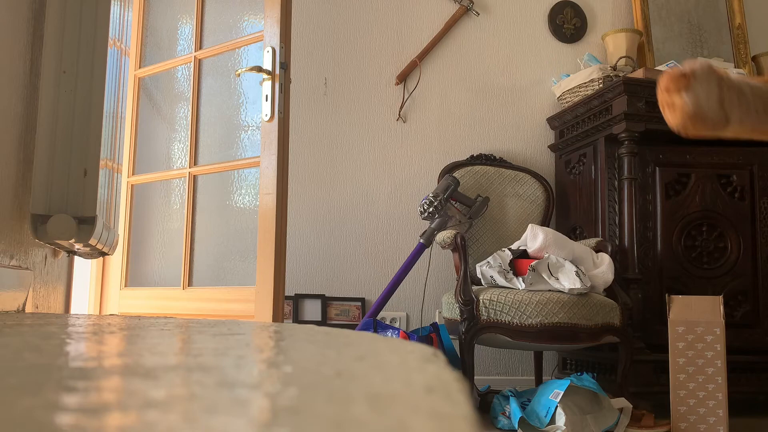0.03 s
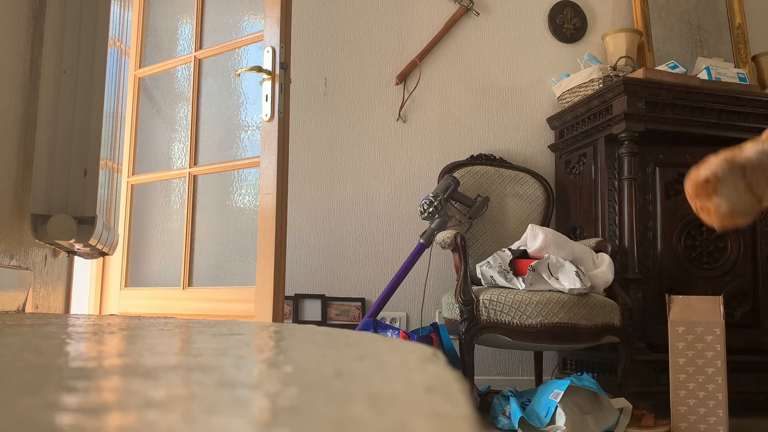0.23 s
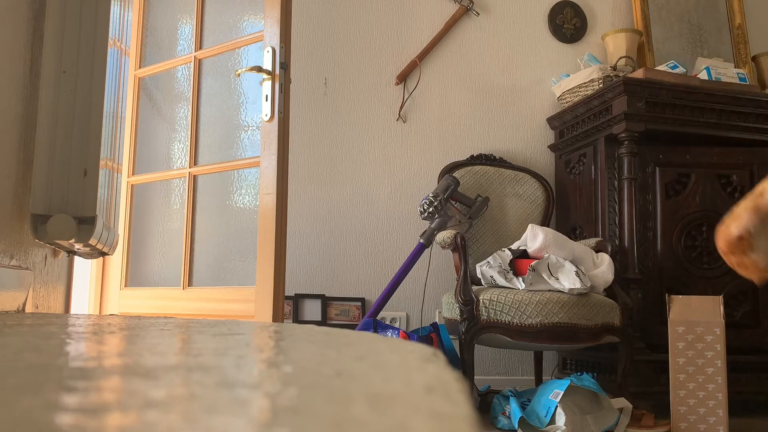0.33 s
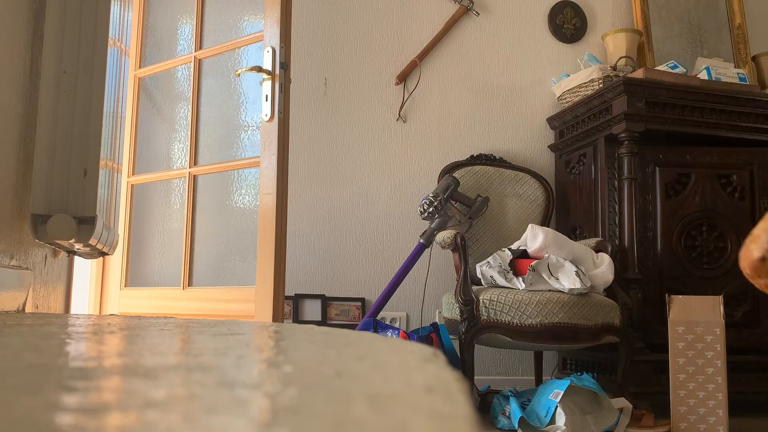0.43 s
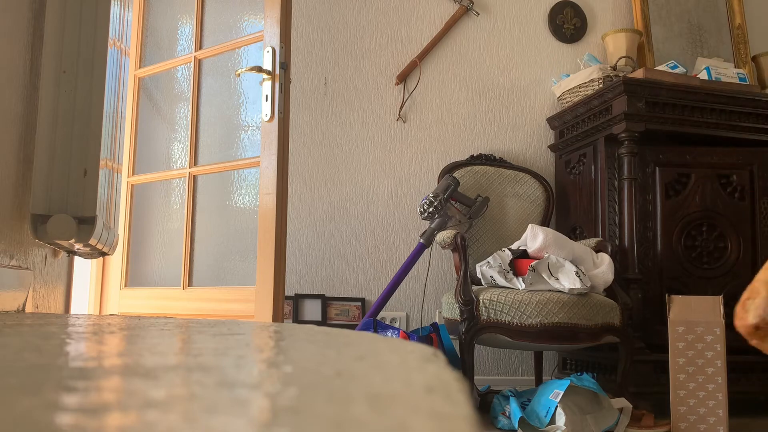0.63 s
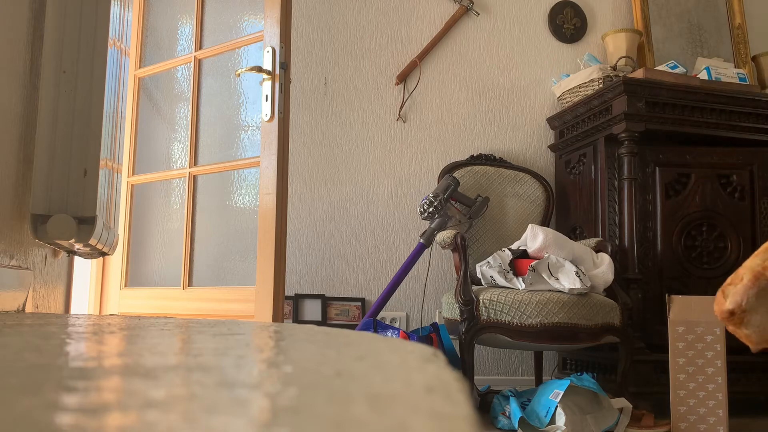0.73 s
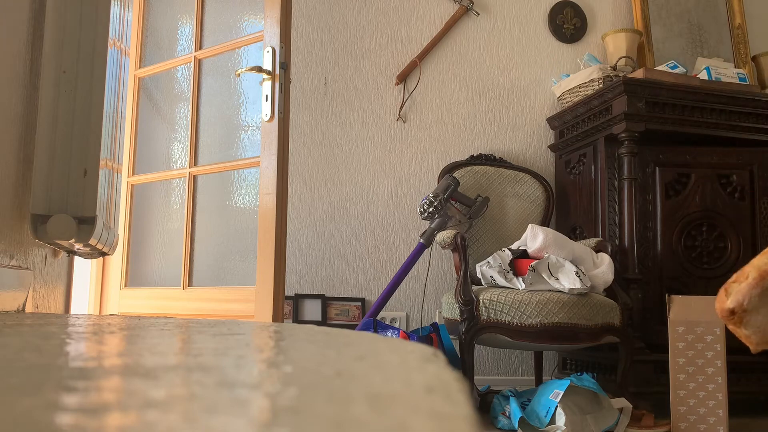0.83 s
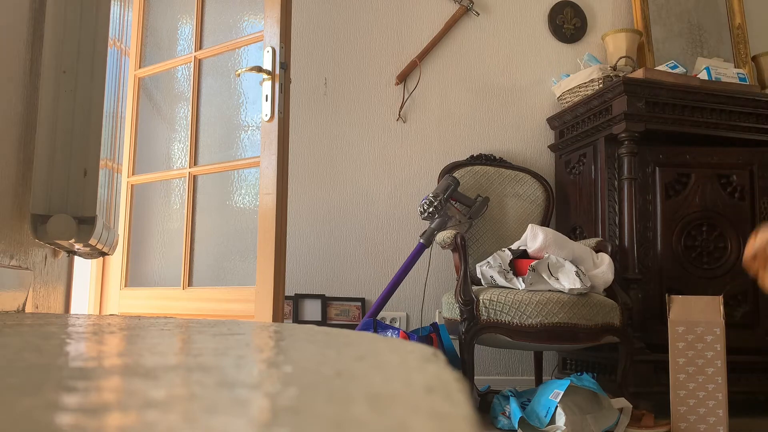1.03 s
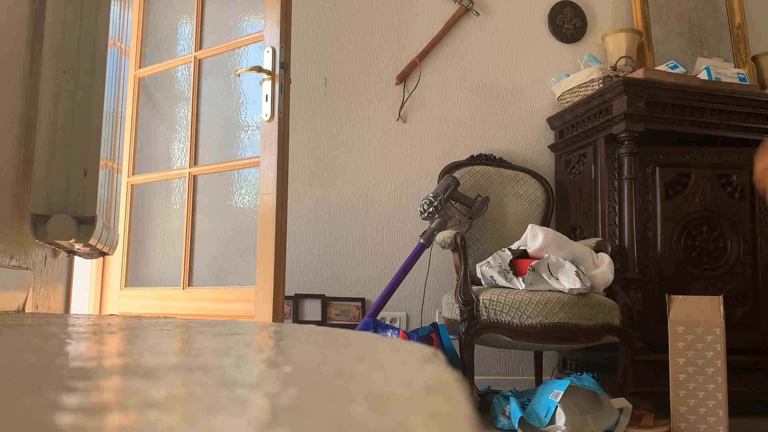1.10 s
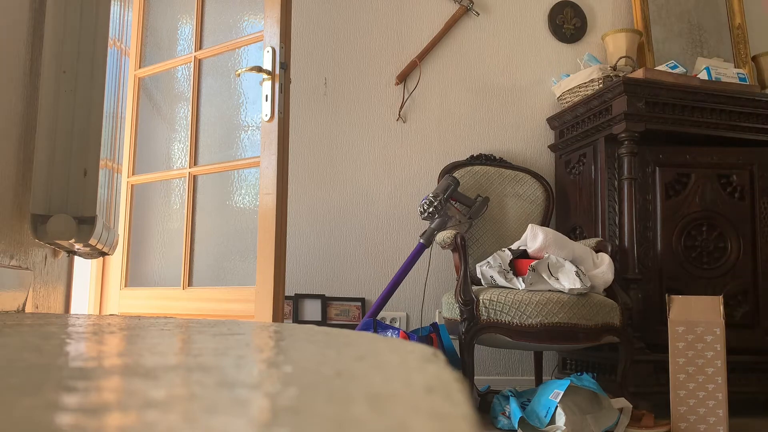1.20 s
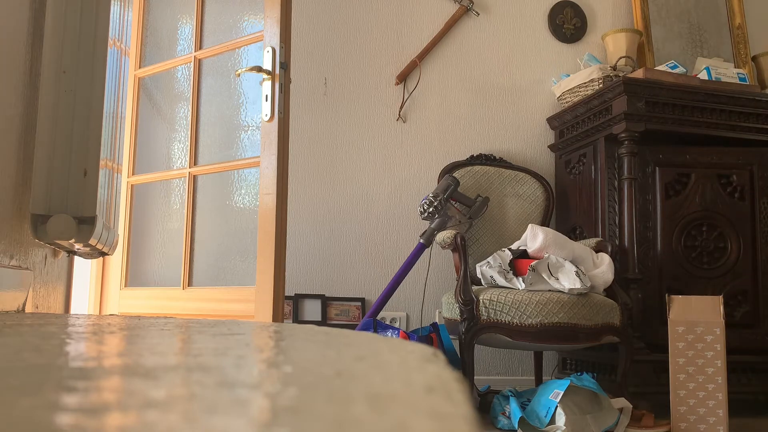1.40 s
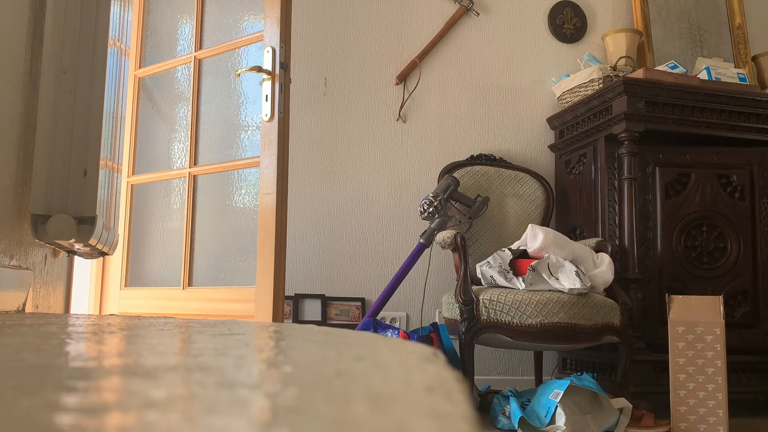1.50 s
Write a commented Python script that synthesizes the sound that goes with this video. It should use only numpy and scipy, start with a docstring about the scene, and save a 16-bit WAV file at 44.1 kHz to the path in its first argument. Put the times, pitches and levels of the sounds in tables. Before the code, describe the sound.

A hard loaf knocks once on a hard surface at about 0.2 seconds, slightly to the right, just after a faint sleeve swish. The crust cracks sharply over a hollow thud, rebounding lightly at 0.3 seconds, and the quiet room booms briefly. Faint crust ticks follow near 0.7 seconds, soft bumps around 0.9 and 1.0, then a light rub and a short, faint scrape with cloth rustle near 1.3.

```python
"""A sharp crack over a dull hollow thud: a hard loaf knocked once on a hard surface, a little to the right.
The crust cracks while loaf and surface ring together; the loaf rebounds lightly, the walls throw the
knock back and the quiet, live room booms briefly. A sleeve swishes as the arm moves; faint crust ticks,
soft bumps, a light rub and a short scrape come with the handling."""
import sys
import numpy as np
from scipy import signal
from scipy.fft import rfft, irfft
from scipy.io import wavfile
from scipy.ndimage import uniform_filter1d

SR = 44100
rng = np.random.default_rng(int(sys.argv[2]) if len(sys.argv) > 2 else 0)


def digitize_waveform(pressure):
    """Quantize a signal to 16-bit integers and store it at the path in sys.argv[1].

    Rows of a 2-D input are taken as channels; values are limited to [-1, 1].
    """
    field = np.atleast_2d(pressure).T
    bounded = np.clip(field, -1, 1)
    quanta = np.round(bounded * 32767).astype(np.int16)
    wavfile.write(sys.argv[1], SR, quanta)


N = 68355
T = np.arange(N) / SR
HZ = np.fft.rfftfreq(N, 1 / SR)
KNOCK_S, REBOUND_S = .2258, .3095
CRACK_RISE_S, RIGHT_LEAD_S = .0026, .00042


# joint modes of loaf and surface (frequency [Hz], level [dB], t60 [s])
LOAF_MODES = [(187.2, 1, 0.11), (297.3, -7, 0.12), (380, -11, .085), (548.4, -13.5, 0.057),
              (730.5, -20.5, 0.14), (951, -16.5, 0.15), (1118, -18.5, .15), (1441, -21, .11),
              (1680, -18.5, 0.1), (2028, -18, 0.043), (3200, -18.5, 0.0092)]
# crust crack spectrum (frequency [Hz], density [dB])
CRACK_SPECTRUM = [(150, 4.5), (500, 4.5), (1100, 2.5), (1700, -7.5), (2400, -16), (3200, -16.5),
                  (4500, -22.5), (7000, -34.5), (10000, -53), (15000, -41.5)]

def contact(start_s, thud_db, crack_db):
    """One contact of the loaf: a hollow thud under the crack of the crust."""
    thud = amp(thud_db) * ring(LOAF_MODES, start_s)
    crack = amp(crack_db) * noise(CRACK_SPECTRUM) * burst(start_s - RIGHT_LEAD_S, CRACK_RISE_S, t60_s=.072)
    return np.array([thud, delay(thud, -RIGHT_LEAD_S)]) + crack


# graze spectrum (frequency [Hz], density [dB])
GRAZE_SPECTRUM = [(100, 0), (200, 0), (400, -8.5), (580, 4.5), (900, -19.5), (2000, -20), (5000, -45)]
# crumbling spectrum (frequency [Hz], density [dB])
CRUNCH_SPECTRUM = [(1000, -3.5), (2000, -5.5), (3200, 0), (4000, 5.5), (7000, -1.5), (10000, -24),
                   (15000, -11)]

def crust():
    """The crust grazes the surface, then crumbles a little under the blow."""
    graze = amp(-17) * noise(GRAZE_SPECTRUM) * np.exp(-abs(T - KNOCK_S) / .0053)
    crunch = amp(-41) * noise(CRUNCH_SPECTRUM) * grains(depth_db=1.5, size_samples=40)
    return graze + crunch * burst(KNOCK_S, CRACK_RISE_S, t60_s=.16)


# low push of the blow (frequency [Hz], level [dB], t60 [s])
PUSH_MODES = [(60, -7, .055), (104, -7, .067)]
# arrivals of the push (delay [s], gain [dB])
PUSH_ARRIVALS = [(0, 2), (0.0476, -1.4), (.091, 1.5), (0.148, -11), (0.2349, -13.5), (.305, -23.5)]

def flutter(start_s=.2308):
    """The blow's low push bounces to and fro between two walls."""
    return sum(amp(db) * ring(PUSH_MODES, start_s + delay_s) for delay_s, db in PUSH_ARRIVALS)


# wall reflections (delay [s], gain [dB], left lag [s])
WALL_ECHOES = [(0.0438, -17, -0.0024), (0.0762, -9, .00075), (.112, -13, .0006), (.182, -22, -.0004)]

def wall_echoes(cutoff_hz=695):
    """Single echoes of the thud, dulled by the walls."""
    dulled = signal.lfilter(*signal.butter(1, cutoff_hz, fs=SR), ring(LOAF_MODES, KNOCK_S))
    return sum(amp(db) * np.array([delay(dulled, delay_s + lag_s), delay(dulled, delay_s)])
               for delay_s, db, lag_s in WALL_ECHOES)


# diffuse room spectrum (frequency [Hz], density [dB])
REVERB_SPECTRUM = [(25, -38), (45, 0), (140, -5), (320, -2.5), (450, -7.5), (700, -8), (1100, -10.5),
                   (2000, -20), (2700, -27.5), (4000, -33), (7000, -46), (15000, -73.5)]
# far-end return spectrum (frequency [Hz], density [dB])
RETURN_SPECTRUM = [(60, -18.5), (130, -5), (330, 0), (450, -4.5), (670, 0.5), (850, -19.5), (1150, -9),
                   (2000, -31), (6000, -51), (15000, -73)]
# standing waves (frequency [Hz], level [dB], t60 [s], left lag [rad])
STANDING_WAVES = [(103, -24, .9, .3), (156, -16, .42, -.4), (174, -15, .42, 0), (212, -24, .6, .8),
                  (251, -11, .44, 1.1), (275, -18, .52, .9), (320, -18, .55, .8), (352, -24, .62, 0),
                  (377, -18.5, .55, 1.7), (413, -24, .53, 1), (515, -20.5, .5, 2), (562, -24.5, .42, 2.2),
                  (668, -32, .5, 2)]

def room():
    """The knock reverberates, scatters back from the far end and excites standing waves."""
    diffuse = amp(-17) * reverb(REVERB_SPECTRUM, KNOCK_S)
    far_return = amp(-21) * noise(RETURN_SPECTRUM) * swell(KNOCK_S + .0997, width_s=.019)
    boom = np.zeros((2, N))
    for hz, db, t60_s, lag_rad in STANDING_WAVES:
        phase = 2 * np.pi * hz * (T - KNOCK_S) + np.array([[0], [lag_rad]])
        boom += amp(db) * burst(KNOCK_S, .025, t60_s) * np.sin(phase)
    return diffuse + far_return + boom


# room decay (frequency [Hz], t60 [s])
REVERB_DECAY = [(60, .42), (130, 0.95), (250, 0.63), (600, 0.62), (1000, 0.52), (2000, 0.43), (5000, 0.25)]

def reverb(spectrum, start_s):
    """Diffuse reverberation, each band dying at its own rate."""
    hz, time_s, bands = signal.stft(noise(spectrum), SR, nperseg=512)
    age_s = np.maximum(time_s - start_s, 0)
    decay = np.exp(-np.log(1000) * age_s / lookup(REVERB_DECAY, hz)[:, None])
    tail = signal.istft(bands * decay, SR, nperseg=512)[1][:, :N]
    return tail * burst(start_s, rise_s=.01, t60_s=np.inf)


# bump modes (frequency [Hz], level [dB], t60 [s])
BUMP_MODES = [(83.4, 5, 0.092), (120.5, 6.5, 0.058), (192, -8.5, 0.12), (265, -28, 0.056),
              (406.5, -20.5, .1)]
# handling bumps (time [s], gain [dB])
BUMP_EVENTS = [(.915, -28), (1.017, -38.5)]

def bumps():
    """Soft handling bumps, each a short low ring."""
    return sum(amp(db) * ring(BUMP_MODES, start_s) for start_s, db in BUMP_EVENTS)


# scrape resonances (frequency [Hz], width [Hz], level [dB])
SCRAPE_PEAKS = [(830, 82, -1.5), (950, 120, 0.5), (1165, 75, -2), (1875, 160, -2), (2800, 150, -8.5)]

def scrape():
    """Dry friction catches quickly and dies away as the arm withdraws."""
    return amp(-39) * friction(SCRAPE_PEAKS) * burst(1.278, rise_s=.019, t60_s=.35)


# swish envelopes (time [s], treble [dB], body [dB], fizz [dB])
SWISH_LEVELS = [(.08, -64, -72, -64.5), (0.127, -48.5, -48, -51), (0.199, -53.5, -50, -57.5),
                (0.299, -65.5, -42.5, -64), (.4, -57.5, -51, -56), (0.499, -58, -55, -59.5),
                (0.619, -68.5, -70, -73), (.67, -64.5, -57.5, -67.5), (.76, -71, -65, -76),
                (.92, -66.5, -62.5, -68), (1.08, -65, -66.5, -59), (1.18, -60, -58, -58.5),
                (1.254, -59, -57.5, -57.5), (1.296, -45.5, -43.5, -48.5), (1.42, -54, -51, -56),
                (1.49, -62, -58, -67), (1.55, -85, -67, -84)]
# spectra of the three swish bands (frequency [Hz], density [dB])
TREBLE_SPECTRUM = [(1500, -15), (2500, -6), (2850, 4.5), (3300, -0.5), (5000, 0), (8800, 0), (10200, -48),
                   (15500, -29)]
BODY_SPECTRUM = [(100, -15), (400, 4.5), (830, 1), (1400, -1.5), (1950, -1.5), (2850, -6), (4500, -21.5),
                 (9000, -41)]
FIZZ_SPECTRUM = [(3000, -27), (10000, -18), (11200, -2.5), (13000, -1), (15500, -2)]

def sleeve():
    """Grainy cloth friction swells with each move of the arm."""
    time_s, *levels_db = np.transpose(SWISH_LEVELS)
    spectra = TREBLE_SPECTRUM, BODY_SPECTRUM, FIZZ_SPECTRUM
    swish = sum(amp(np.interp(T, time_s, db)) * noise(band) for db, band in zip(levels_db, spectra))
    return swish * grains(depth_db=1.5, size_samples=60)


# downswing envelope (time [s], level [dB])
SWING_LEVELS = [(0, -87), (.08, -53), (.14, -43), (.22, -41.5), (.3, -73)]
# downswing spectrum (frequency [Hz], density [dB])
SWING_SPECTRUM = [(50, -26), (215, -9), (262, 5.5), (305, -6), (370, -10), (460, -28.5), (2000, -46)]

def arm_swing():
    """Low rustle as the arm swings down."""
    return amp(np.interp(T, *np.transpose(SWING_LEVELS))) * noise(SWING_SPECTRUM)


# crust ticks (time [s], level [dB], fizz [dB])
TICK_EVENTS = [(0.2064, -40.5, -41.5), (0.655, -42, -63), (0.7072, -47.5, -77)]
# tick spectrum (frequency [Hz], density [dB])
TICK_SPECTRUM = [(200, 2.5), (1200, -2.5), (2200, 0), (3500, -9), (5200, -10), (8000, -35.5), (15000, -30)]
# crust resonances (frequency [Hz], width [Hz], level [dB])
CRUST_PEAKS = [(1580, 220, -10), (2190, 200, -2), (2440, 130, -0.5)]

def ticks():
    """Faint crust ticks: a snap, its reverberation, a brief ring and a bright fizz."""
    out = np.zeros((2, N))
    for start_s, db, fizz_db in TICK_EVENTS:
        snap = noise(TICK_SPECTRUM) * burst(start_s, rise_s=.0011, t60_s=.04)
        tail = amp(-17) * reverb(TICK_SPECTRUM, start_s)
        ringing = amp(-7) * friction(CRUST_PEAKS) * burst(start_s, rise_s=.0012, t60_s=.079)
        fizz = (noise(TREBLE_SPECTRUM) + noise(FIZZ_SPECTRUM)) * burst(start_s, rise_s=.00036, t60_s=.043)
        out += amp(db) * (snap + tail + ringing) + amp(fizz_db) * fizz
    return out


def rub():
    """A light rub excites the crust's resonances."""
    return amp(-56) * friction(CRUST_PEAKS) * swell(1.181, width_s=.059)


# room tone spectrum (frequency [Hz], density [dB])
AIR_SPECTRUM = [(20, -47.5), (50, -8.5), (100, -6), (450, -9.5), (700, -19), (1000, -16.5), (1400, -24.5),
                (2500, -27), (15000, -54.5)]

def room_tone(hum_hz=101.6):
    """Quiet air with a faint mains hum."""
    hum = amp(-59) * np.sqrt(2) * np.sin(2 * np.pi * hum_hz * T)
    return amp(-53.5) * noise(AIR_SPECTRUM) + hum


# direct sound from the right (frequency [Hz], share [0-1])
DIRECT_FRACTION = [(60, 0.5), (500, 0.72), (2000, 0.12), (4000, 0.078), (8000, 0.58)]
# its phase between the microphones (frequency [Hz], left lead [rad])
DIRECT_PHASE = [(60, 0), (250, -.6), (430, -1.9), (650, -3.4), (1120, -5.2), (1600, -4.2), (2840, -13.8),
                (3190, -15.8), (4130, -11.2), (4650, -12.3), (6290, -17.9), (8500, -15.9), (11300, -13.3),
                (15300, -11.8)]

def at_mics(gain, spacing_s=.00065):
    """Unit-rms shaped noise at two spaced microphones: part diffuse, part from the right."""
    left, independent = rfft(rng.standard_normal((2, N)))
    share = lookup(DIRECT_FRACTION, HZ)
    direct = np.exp(-1j * lookup(DIRECT_PHASE, HZ))
    coherence = (1 - share) * np.sinc(2 * HZ * spacing_s) + share * direct
    right = coherence * left + np.sqrt(np.maximum(1 - abs(coherence) ** 2, 0)) * independent
    return unit(irfft(np.array([left, right]) * gain, N))


def noise(spectrum):
    """Stereo noise shaped by a relative spectrum."""
    return at_mics(amp(lookup(spectrum, HZ)))


def friction(peaks):
    """Friction noise ringing in narrow resonances."""
    return at_mics(sum(amp(db) / (1 + (2 * (HZ - hz) / width_hz) ** 2) for hz, width_hz, db in peaks))


def ring(modes, start_s):
    """Struck modes, each rising over its first cycle."""
    return sum(amp(db) * burst(start_s, 1 / hz, t60_s) * np.sin(2 * np.pi * hz * (T - start_s))
               for hz, db, t60_s in modes)


def burst(start_s, rise_s, t60_s):
    """Smooth rise, exponential fall."""
    age_s = np.maximum(T - start_s, 0)
    return (1 - np.exp(-(age_s / rise_s) ** 2)) * np.exp(-np.log(1000) * age_s / t60_s)


def swell(peak_s, width_s):
    """Bell-shaped envelope."""
    return np.exp(-((T - peak_s) / width_s) ** 2)


def grains(depth_db, size_samples):
    """Random level flicker."""
    flicker = unit(uniform_filter1d(rng.standard_normal(N), size_samples))
    return unit(amp(depth_db * np.clip(flicker, -2, 2)))


def delay(x, delay_s):
    """Fractional-sample delay."""
    hz = np.fft.rfftfreq(2 * N, 1 / SR)
    return irfft(rfft(x, 2 * N) * np.exp(-2j * np.pi * hz * delay_s))[..., :N]


def lookup(table, hz):
    """Log-frequency interpolation."""
    table_hz, values = np.transpose(table)
    return np.interp(np.log(hz + 1), np.log(table_hz), values)


def amp(db):
    """Decibels to gain."""
    return 10 ** (np.asarray(db) / 20)


def unit(x):
    """Scales to rms 1."""
    return x / np.sqrt(np.mean(x ** 2) + 1e-20)


def scene():
    """Knock, room response, handling and room tone in stereo."""
    knock = contact(KNOCK_S, thud_db=0, crack_db=-12)
    rebound = contact(REBOUND_S, thud_db=-12, crack_db=-22.5)
    loaf = knock + rebound + crust()
    response = flutter() + wall_echoes() + room()
    handling = bumps() + rub() + ticks() + sleeve() + arm_swing() + scrape()
    return loaf + response + handling + room_tone()


def record(dry, open_s=.0842, cutoff_hz=15650):
    """Fade-in from near silence, soft ceiling, band limit."""
    opened = dry * amp(np.interp(T, [open_s - .01, open_s], [-32, 0]))
    limited = opened / (1 + opened ** 8) ** (1 / 8)
    lowpass = signal.firwin(511, cutoff_hz, window=("kaiser", 9), fs=SR)
    return signal.oaconvolve(limited, lowpass[None], "same")


dry = scene()
out = record(dry)
digitize_waveform(out)
```